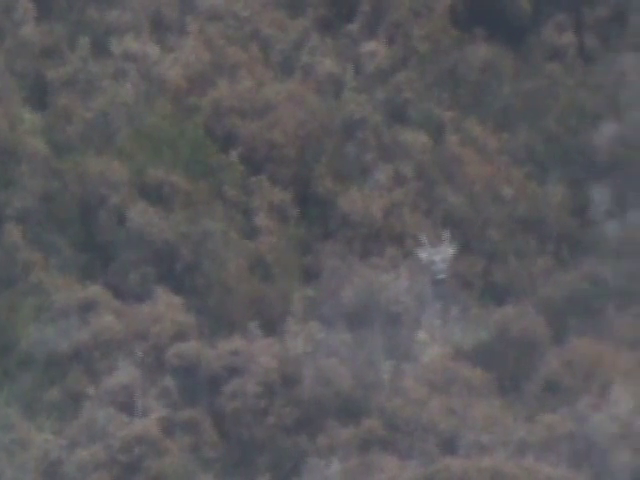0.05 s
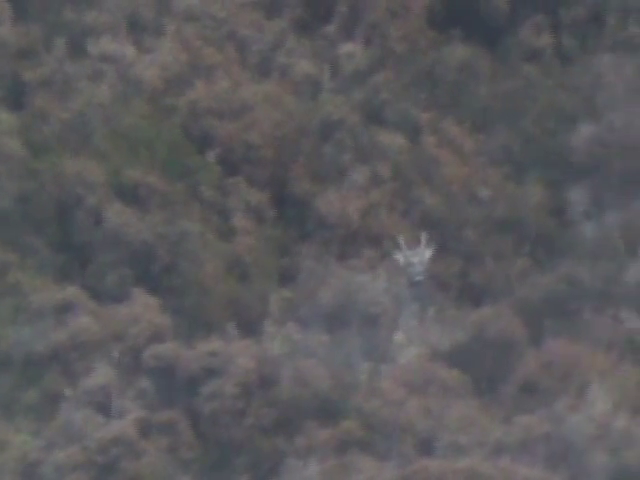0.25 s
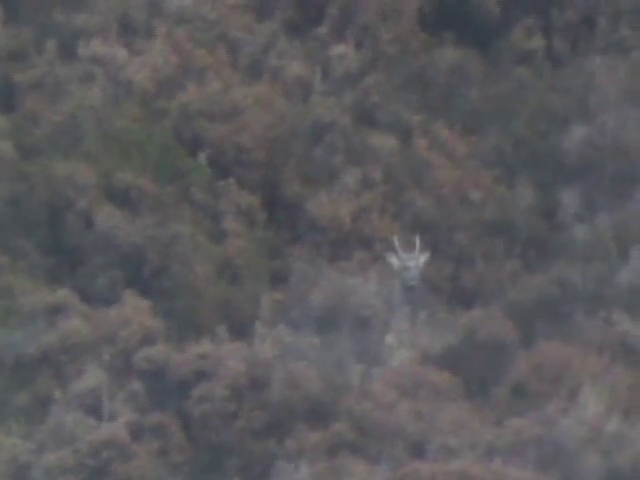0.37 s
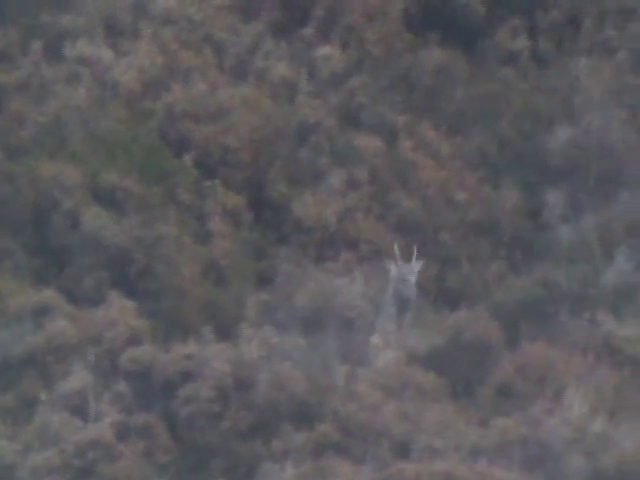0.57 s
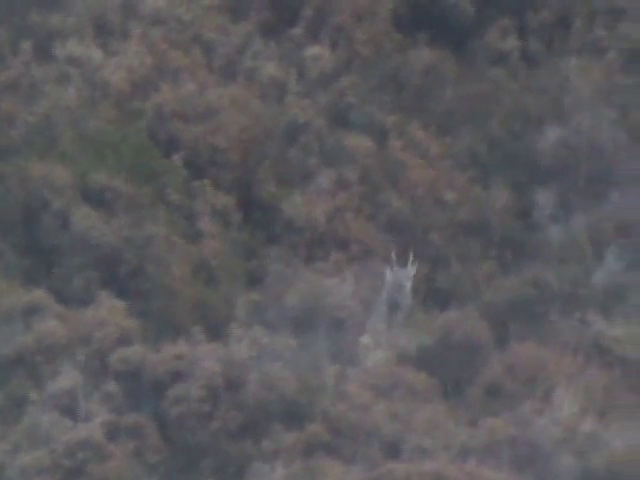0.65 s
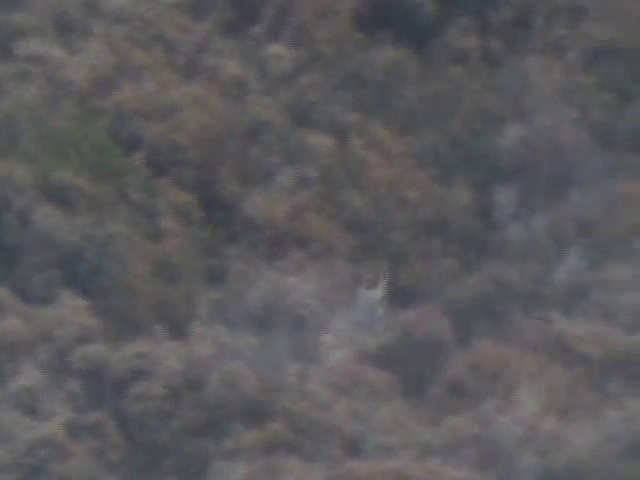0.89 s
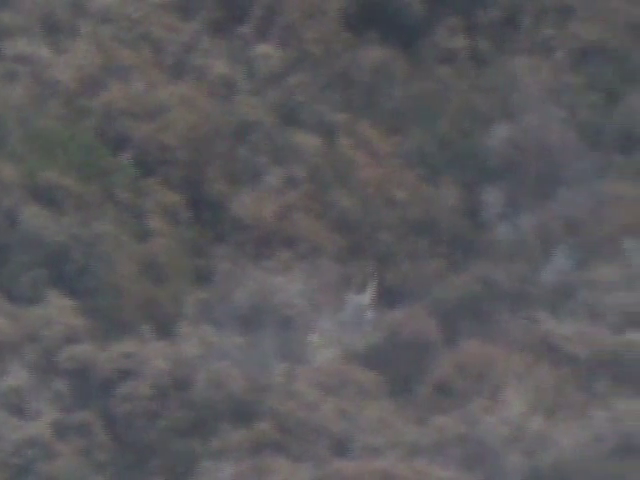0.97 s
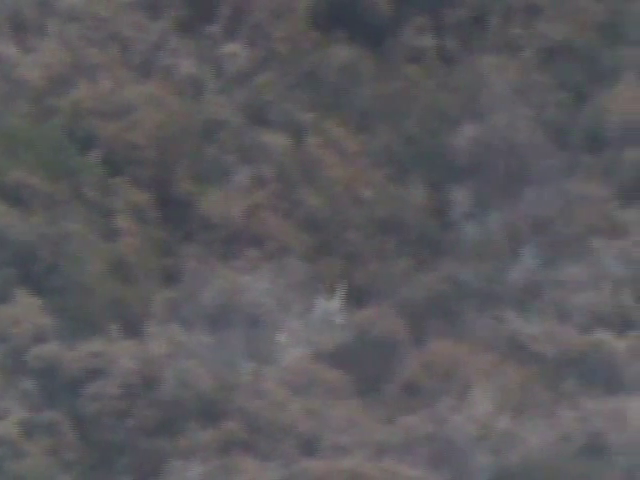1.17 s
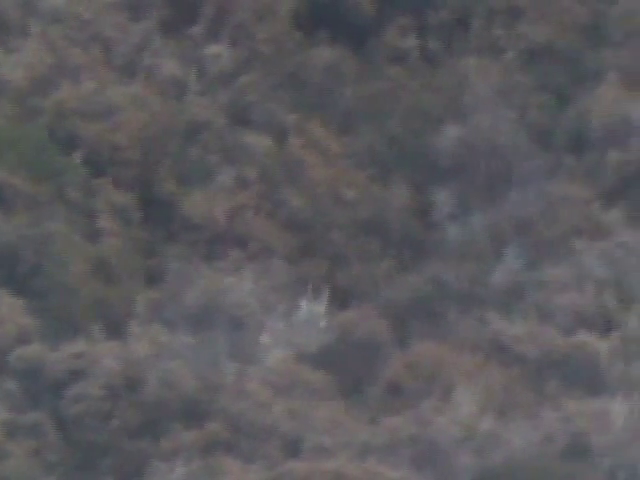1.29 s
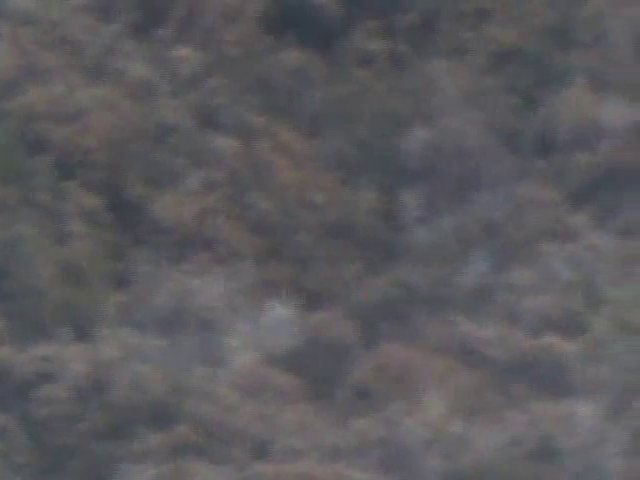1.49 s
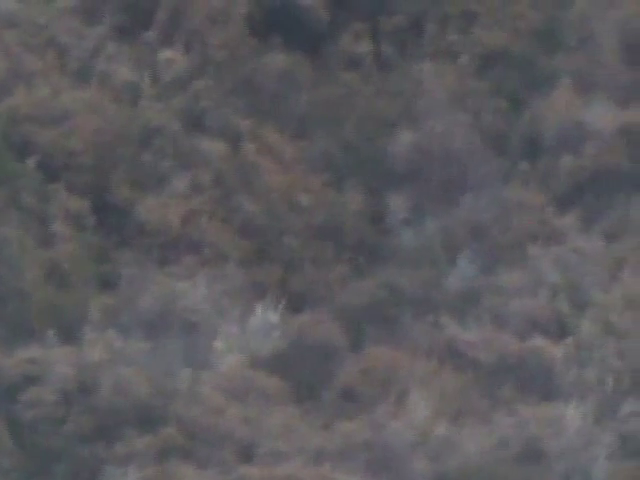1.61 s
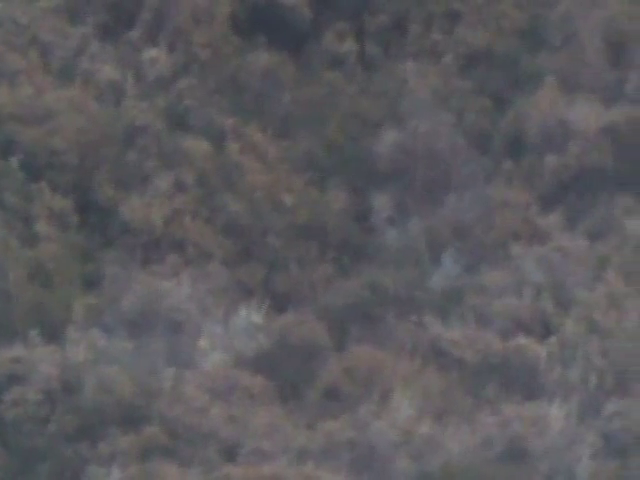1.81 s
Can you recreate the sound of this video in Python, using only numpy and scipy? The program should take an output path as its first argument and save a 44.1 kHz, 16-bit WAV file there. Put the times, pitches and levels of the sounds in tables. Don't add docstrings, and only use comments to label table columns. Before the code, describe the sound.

Two brief raspy crow caws ring out over open brushland with a faint echoing tail. Quiet wind, a tiny distant falling bird whistle between them, and light handling-like knocks near the microphone at the end.

```python
import sys
import numpy as np
from scipy import signal
from scipy.io import wavfile
from scipy.ndimage import uniform_filter1d

SR = 44100
rng = np.random.default_rng(int(sys.argv[2]) if len(sys.argv) > 2 else 0)


def waveform_to_disk(signal):
    frames = np.transpose(np.atleast_2d(signal))
    scaled = np.clip(frames, -1, 1) * 32767
    samples = np.round(scaled).astype(np.int16)
    wavfile.write(sys.argv[1], SR, samples)


def elevation(decibels):
    levels = np.asarray(decibels, float)
    return 10 ** (levels / 20)


N = 81585


def evened(x):
    return x / np.sqrt(np.mean(x ** 2) + 1e-20)


def read(points, hz):
    f, value = np.transpose(points)
    return np.interp(np.log(hz + 1), np.log(f + 1), value)


def add(mix, start_s, sound):
    part = mix[round(start_s * SR):][:len(sound)]
    part += sound[:len(part)]


def resonate(x, hz, width_hz):
    r = np.exp(-np.pi * width_hz / SR)
    return signal.lfilter([1 - r, 0, r - 1], [1, -2 * r * np.cos(2 * np.pi * hz / SR), r * r], x)


# frequency in Hz, level in dB per Hz.
WIND_SPECTRUM = [(20, -4), (45, -3.5), (200, -6), (500, -0.5), (1300, -2.5), (3000, -7), (7500, -11.5),
                 (13500, -23)]
# frequency in Hz, correlation from -1 to 1.
WIND_LIKENESS = [(30, 1), (130, 0.91), (400, 0.46), (1000, 0.35), (2500, 0.21), (5000, 0.55), (9000, 0.63),
                 (12500, 0.6)]


def wind(level_db=-54, patch_db=1.0):
    frames, hz = N // 256 + 5, np.fft.rfftfreq(1024, 1 / SR)
    a, b, c, d, patches = rng.standard_normal((frames, 513, 5)).T
    patches = uniform_filter1d(patches, size=12, axis=0)
    patches = evened(uniform_filter1d(patches, size=12, axis=1))
    same = np.clip(read(WIND_LIKENESS, hz), -1, 1)[:, None]
    shared = np.sqrt((1 + same) / 2) * (a + 1j * b)
    side = np.sqrt((1 - same) / 2) * (c + 1j * d)
    z = shared + np.array([side, -side])
    z *= elevation(read(WIND_SPECTRUM, hz)[:, None] + patch_db * patches)
    rush = signal.istft(z, nperseg=1024, noverlap=768)[1][:, :N]
    return elevation(level_db) * evened(rush)


# centre in seconds, level in dB, length (Gaussian sigma) in seconds.
WING_STROKES = [
    (0.19, -58, 0.068),
    (.70, -56.5, 0.03),
    (.98, -57, 0.037),
    (1.286, -59, 0.068),
    (1.814, -54, 0.017),
]


def wings(hollow_hz=596, width_hz=223, feather_db=-6.5, lump_db=1.3):
    t = np.arange(N) / SR
    air, lumps = rng.standard_normal((N, 2)).T
    strokes = sum(elevation(db) * np.exp(-.5 * ((t - s) / length_s) ** 2) for s, db, length_s in WING_STROKES)
    air = air * elevation(lump_db * evened(uniform_filter1d(lumps, size=300)))
    hollow = resonate(resonate(air, hollow_hz, width_hz), hollow_hz, 2 * width_hz)
    feathers = resonate(air, 1500, 1670)
    return strokes * (evened(hollow) + elevation(feather_db) * evened(feathers))


# time in seconds, effort in dB, pitch in Hz.
CAWS = [
    [(.21, -59, 282), (.235, -55, 298), (.246, -48, 316), (.28, -42.5, 326), (.332, -37.5, 361),
     (.375, -36.5, 362.7), (.425, -36.5, 357.4), (.448, -40, 331.8), (.466, -55, 315)],
    [(1.33, -86, 290), (1.362, -56.5, 296), (1.38, -50, 323), (1.425, -44, 351.7), (1.478, -39, 373.9),
     (1.51, -37, 380.3), (1.55, -37, 378.4), (1.568, -43, 363.7), (1.582, -47.5, 345)],
]
# time in seconds, beats gone by, depth in dB.
RATTLES = [
    [(.202, 0, 30), (.2455, 3, 33), (.277, 5, 33), (.3125, 7, 23), (.3525, 9, 12), (.375, 10, 11),
     (.534, 17, 14)],
    [(1.321, 0, 34), (1.3635, 3, 35), (1.3935, 5, 30), (1.4255, 7, 24), (1.459, 9, 16), (1.501, 11, 13),
     (1.66, 18, 15)],
]
TURNED_DB = [-1, -2.5]
# frequency in Hz, width in Hz, level in dB.
BODY = [(540, 300, -34), (745, 490, -15.5), (1240, 180, 2.5), (1378, 137, -9.5), (1625, 107, -5),
        (2755, 360, -7.5)]
# frequency in Hz, width in Hz, level in dB.
BEAK = [(2835, 1260, -7), (3800, 425, -4), (4600, 2500, -17.5), (6310, 300, -22), (7160, 1350, -21.5)]

WARBLE, WARBLE_LAG_BEATS = .12, .27
JITTER, SHIMMER_DB, BREATH = .012, 1.0, .2
FALL_BEATS, REBUILD_POWER = .24, .6
LOCK_DB, SWING_DB = 19, 17
CHEST_DB = -13.5
HOLLOW_HZ, HOLLOW_Q = 1955, 2.2


def throat_and_beak(body, beak, turned_db):
    voice = 0
    for hz, width_hz, db in BODY:
        voice = voice + elevation(db) * resonate(resonate(body, hz, width_hz), hz, 6.3 * width_hz)
    for k, (hz, width_hz, db) in enumerate(BEAK, 1):
        gain = (-1) ** k * elevation(db + turned_db * max(hz / 1000 - 3.5, 0))
        voice = voice + gain * resonate(resonate(beak, hz, width_hz), hz, 2 * width_hz)
    return elevation(13.5) * signal.lfilter(*signal.iirnotch(HOLLOW_HZ, HOLLOW_Q, SR), voice)


def caw(rows, rattle, turned_db):
    row_s, row_db, row_hz = np.transpose(rows)
    t = np.arange(row_s[0], row_s[-1] + .04, 1 / SR)
    effort_db, hz = np.interp(t, row_s, row_db), np.interp(t, row_s, row_hz)
    voiced = t < row_s[-1]
    wobble, shimmer, air = rng.standard_normal((SR // 2, 3))[:len(t)].T

    rattle_s, beats_gone, depth_db = np.transpose(rattle)
    phase = np.interp(t, rattle_s, beats_gone) % 1
    depth_db = np.interp(t, rattle_s, depth_db)
    dip = np.minimum(phase / FALL_BEATS, (1 - phase) / (1 - FALL_BEATS))
    dip = dip ** ((SWING_DB / depth_db) ** REBUILD_POWER)

    warble = WARBLE * np.cos(2 * np.pi * (phase - WARBLE_LAG_BEATS))
    hz = hz * (1 + warble + JITTER * evened(uniform_filter1d(wobble, size=120)))
    turns = np.cumsum(hz) / SR
    beats = np.flatnonzero((np.diff(phase, prepend=0) < 0) & (depth_db > LOCK_DB))
    turns += np.interp(t, t[beats], np.round(turns[beats]) - turns[beats])

    folds = sum(np.cos(2 * np.pi * k * turns) for k in range(1, 26)) / np.sqrt(13)
    folds = folds * elevation(SHIMMER_DB * evened(uniform_filter1d(shimmer, size=120)))
    folds += BREATH * air * (1 + np.cos(2 * np.pi * turns))
    folds *= elevation(effort_db) * voiced
    body = elevation((SWING_DB - depth_db) * (dip - 0.4575)) * folds
    beak = elevation(-depth_db * dip) * folds

    chest_db = CHEST_DB + 0.62 * (effort_db + 39.5) - 39.5 - 0.067 * depth_db * dip
    chest = elevation(chest_db) * voiced * np.sin(2 * np.pi * turns)
    return row_s[0], throat_and_beak(body, beak, turned_db) + chest


# frequency in Hz, t60 in seconds.
SLOPE_T60 = [(300, 0.95), (1200, 2.25), (3000, 2.1), (8000, 0.59)]


def echoes(x, first_tap, t60_scale):
    taps = np.zeros((2, SR))
    grid = np.arange(first_tap, SR - 20, 20)
    at = grid + rng.integers(0, 20, (2, len(grid)))
    np.put_along_axis(taps, at, rng.choice([-1., 1.], at.shape), 1)
    hz, t, z = signal.stft(taps, SR, nperseg=256)
    decay_db = -60 * t / (t60_scale * read(SLOPE_T60, hz))[:, None]
    tail = signal.istft(z * elevation(decay_db), SR, nperseg=256)[1]
    return signal.fftconvolve(x[None], tail / np.linalg.norm(tail[0]), axes=1)[:, :N]


# start in seconds, level in dB, frequency in Hz, t60 in seconds.
KNOCKS = [
    (.796, -44, 218, 0.067),
    (.47, -50.5, 216, 0.11),
    (1.787, -44, 2300, 0.021),
    (1.817, -36, 870, 0.0084),
    (1.822, -35.5, 2760, 0.0047),
    (1.843, -43.5, 605, 0.028),
]


def knocks():
    out, t = np.zeros(N), np.arange(4000) / SR
    for start_s, db, hz, t60_s in KNOCKS:
        level = elevation(db - 60 * t / t60_s) * np.minimum(t * hz / 0.85, 1)
        add(out, start_s, level * np.sin(2 * np.pi * hz * t))
    return out


# time in seconds, pitch in Hz, level in dB.
WHISTLE = [
    (.61, 7150, -71),
    (.65, 6300, -67),
    (.696, 5590, -66),
    (.735, 5130, -68),
    (.77, 4900, -75),
]


def whistle():
    out, (s, hz, db) = np.zeros(N), np.transpose(WHISTLE)
    t = np.arange(s[0], s[-1], 1 / SR)
    level = np.sqrt(2) * elevation(np.interp(t, s, db)) * signal.windows.tukey(len(t), .2)
    turns = np.cumsum(np.interp(t, s, hz)) / SR
    add(out, s[0], level * np.sin(2 * np.pi * turns))
    return out


def scene(pan_db=-0.5, slope_db=-22.5, near_db=-15.5):
    crow = np.zeros(N)
    for call in zip(CAWS, RATTLES, TURNED_DB):
        add(crow, *caw(*call))
    space = elevation(slope_db) * echoes(crow, 1500, 1.0) + elevation(near_db) * echoes(crow, 40, .08)
    bird = (crow + wings()) * elevation(np.array([[pan_db], [-pan_db]]))
    return bird + space + wind() + knocks() + whistle()


def roll_off(x):
    return signal.sosfilt(signal.butter(12, 13760, fs=SR, output="sos"), x)


def record(dry, edge_hz=13750):
    lowpass = signal.firwin(511, edge_hz, window=("kaiser", 9), fs=SR)
    mix = signal.oaconvolve(dry, lowpass[None], "same")
    return roll_off(mix)


dry = scene()
out = record(dry)
waveform_to_disk(out)
```